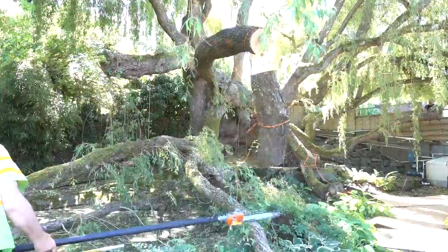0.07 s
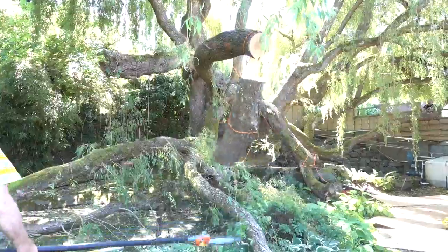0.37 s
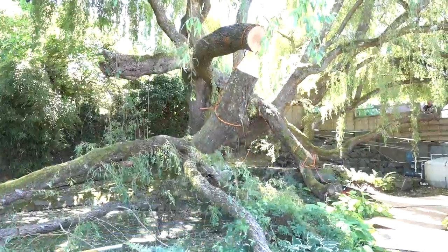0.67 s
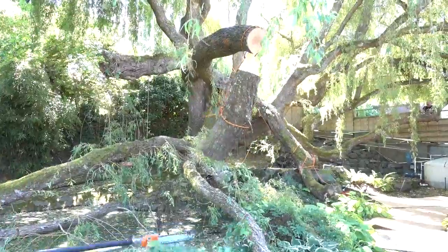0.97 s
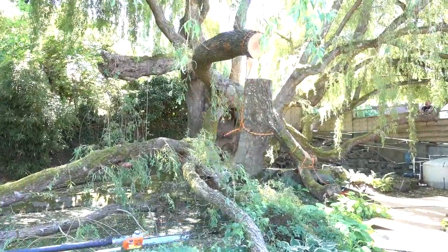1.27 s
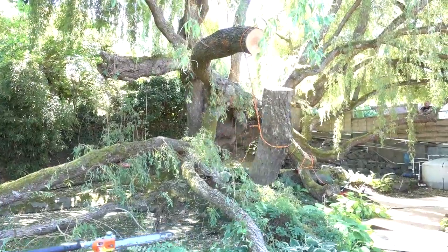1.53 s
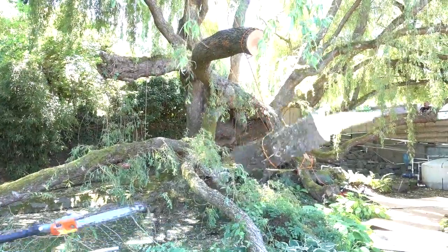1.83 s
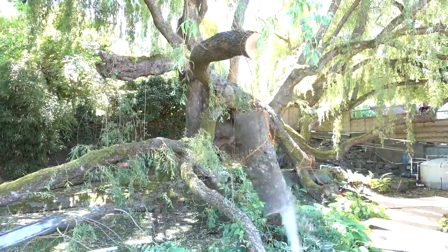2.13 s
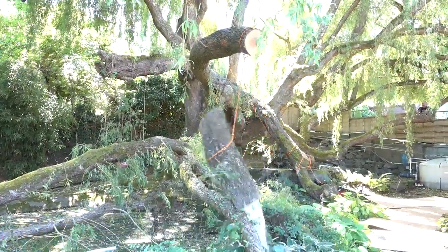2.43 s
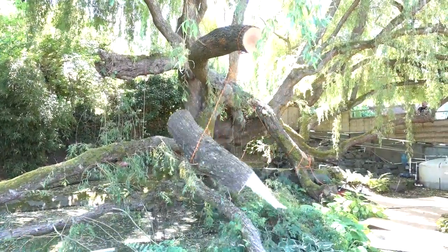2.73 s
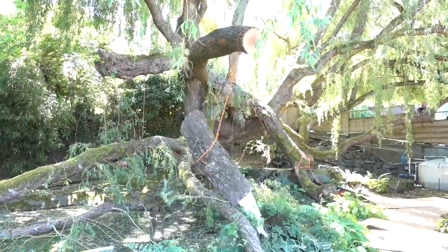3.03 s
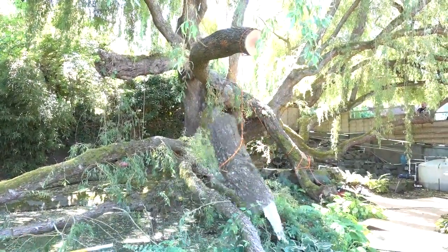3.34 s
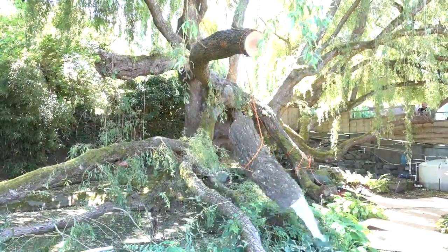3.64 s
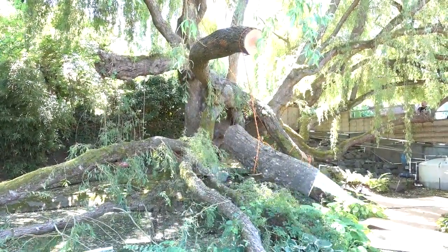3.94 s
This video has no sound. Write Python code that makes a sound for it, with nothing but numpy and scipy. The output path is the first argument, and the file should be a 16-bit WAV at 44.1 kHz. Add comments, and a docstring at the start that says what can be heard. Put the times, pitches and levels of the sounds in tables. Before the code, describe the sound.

A two-stroke pole saw idles close on the left, then cuts out and rattles to a stop. A cut log breaks loose with a crack and swings through branches, with snapping twigs, rustling leaves and wooden knocks in a quiet garden.

```python
"""Quiet garden with a short echo. A two-stroke pole saw idles close by on the left, is switched off
and coasts to a stop: gas pulses ring its silencer, the casing clacks, the chain rattles.
A sawn log on a rope breaks loose, swings through willow twigs and rings as it bumps fallen limbs.
Twigs snap, leaves rustle and bark scrapes over faint outdoor air."""
import sys
import numpy as np
from scipy import signal
from scipy.fft import rfft, irfft
from scipy.io import wavfile

SR = 44100
rng = np.random.default_rng(int(sys.argv[2]) if len(sys.argv) > 2 else 0)


def store_wav(level_fs):
    """Save 16-bit WAV to argv[1]."""
    pcm = np.round(np.clip(np.atleast_2d(level_fs), -1, 1) * 32767)
    wavfile.write(sys.argv[1], SR, pcm.T.astype(np.int16))


N = 176400

# idle firings: start_s, level_db
FIRINGS = [(.0075,0),(0.0476,1),(0.0847,0),(0.1241,1.5),(0.1625,3.5),(0.2022,-1.5),(0.2416,-1.5),(0.2817,1),(0.3224,-2.5),(0.366,-2),(0.4092,3),(0.4517,1.5),(0.4952,1.5),(0.5364,-1.5),(0.5779,1.5)]
# piston strokes after ignition cut: start_s, puff_db, rattle_db
COAST_STROKES = [(0.626,-0.5,-1),(0.676,-4.5,2),(0.728,-4,-8),(0.741,-1.5,-6.5),(0.794,-4,-8.5),(0.818,-4.5,-6.5),(0.886,-37,-8),(0.926,-14,-7.5),(.968,-20,-20),(1.013,-14,-10.5),(1.064,-17,-16.5)]
# silencer resonances: centre_hz, width_hz, gain_db
SILENCER_MODES = [(260,78,-6.5),(329,82,3.5),(450,83,-19),(539,66,-0.5),(970,210,-5)]
REBOUND_S = 0.0105  # firing to second puff


def puff(level_db, size=4096):
    """One gas pulse rings the silencer, slightly detuned each time."""
    detune = np.exp(0.045 * rng.standard_normal())
    modes = [(hz * detune, width_hz, db) for hz, width_hz, db in SILENCER_MODES]
    return undb(14 + level_db) * resonate(signal.unit_impulse(size), modes)


def saw_exhaust():
    """Two puffs per firing; one dull, wheezing puff per coasting stroke."""
    puffs, wheeze_env = np.zeros((2, N))
    for start_s, db in FIRINGS:
        add(puffs, start_s - 0.00088, puff(db / 2))  # just ahead of the clack
        add(puffs, start_s + REBOUND_S, puff(db / 2 - 5.5))
    for start_s, puff_db, _ in COAST_STROKES:
        add(puffs, start_s, cut(puff(puff_db), 540, "low"))
        wheeze_env += undb(puff_db) * burst(start_s, 0.0024, 0.0058)
    wheeze = resonate(cut(wheeze_env * rng.standard_normal(N), 590, "low"), SILENCER_MODES)
    return cut(cut(puffs + undb(-10) * wheeze, 188, "high"), 2600, "low")


def saw_mechanics(casing_q=14.1, pan_db=9):
    """Clacks, chain rattle and whirr ring the casing over a rush of noise; coasting strokes clink."""
    casing_modes = [(1150,-5),(1410,3.5),(1630,3),(2000,1.5),(2400,-0.5),(2660,4),(3250,1.5),(3870,-0.5),(5300,-0.5),(6740,-2.5),(8750,-11),(10400,-23)]  # centre_hz, gain_db
    whirr_levels = [(.39,-3.5),(.85,-5.5),(1.08,-7),(1.2,-19)]  # turning engine: time_s, level_db
    rush_spectrum = [(150,-37),(600,-6.5),(1500,3.5),(11000,-0.5)]  # freq_hz, density_db
    clack_env, rattle_env, clink_env = np.zeros((3, N))
    for start_s, db in FIRINGS:
        clack_env += undb(db) * burst(start_s, 0.0012, 0.0028)
        rattle_env += undb(db / 2 - 1) * burst(start_s + REBOUND_S, 0.00028, 0.011)
    for start_s, _, rattle_db in COAST_STROKES:
        clink_env += undb(rattle_db) * burst(start_s, 0.0014, 0.014)
        rattle_env += undb(rattle_db) * burst(start_s, 0.0034, 0.01)
    whirr_env = curve(whirr_levels)
    clack = undb(-13) * clack_env * noise(1.0)
    rattle = undb(-13) * cut(rattle_env * grains(1800, 1.14, 0.71), 3440, "low")
    whirr = undb(-41.5) * whirr_env * noise(0.25)
    casing = resonate(clack + rattle + whirr, [(hz, hz / casing_q, db) for hz, db in casing_modes])
    clink = undb(-9.5) * band(clink_env * noise(0.26), casing_modes[1][0], width_hz=84)
    rush = undb(-31.5) * colour((whirr_env + undb(6) * clack_env) * noise(1.02), rush_spectrum)
    return (cut(casing, 960, "high") + clink) * pan(pan_db) + rush


def saw_rumble():
    """Low engine noise, fading as the saw stops."""
    levels = [(.02,-34),(.08,-39),(.3,-38.5),(.38,-29.5),(.52,-37),(.85,-54.5),(1.3,-70)]  # time_s, level_db
    spectrum = [(40,-22),(75,5),(105,-1),(370,6.5),(700,1),(1500,-19)]  # freq_hz, density_db
    return curve(levels) * colour(noise(0.15), spectrum)


def twig_snaps(size=4096):
    """A twig gives with one click; its last fibres tear and ring it briefly."""
    snaps = [(1.1529,-3.5,5330,0.00031),(1.1532,-15,2280,0.00069),(1.269,-13,3650,0.0018),(1.3195,-14.5,6800,0.0015),(1.3772,-17,2600,0.001),(1.563,-24.5,2160,0.0013),(1.8695,-15,2750,0.00074),(1.912,-20.5,4470,0.00056),(1.9216,-19.5,2050,0.0015),(1.973,-12.5,2680,0.0011),(1.991,-16,1540,0.0011),(2.0764,-14.5,5300,0.0008),(2.103,-17,1380,0.0009),(2.178,-19.5,2830,0.0015),(2.333,-14,2030,0.00055),(2.352,-14.5,5640,0.0009),(2.4544,-21,6140,0.00055),(2.4722,-17.5,2040,0.0011),(2.534,-19,2150,0.0019),(2.57,-22,5500,0.0012),(2.844,-27.5,2100,0.0016),(2.9674,-10,2070,0.00053),(2.9675,-6.5,9200,0.00057),(3.1014,-18.5,3800,0.0017),(3.129,-19,3020,0.0046),(3.191,-25,1420,0.0035),(3.196,-21,2880,0.00098)]  # start_s, level_db, ring_hz, decay_s
    out = np.zeros((2, N))
    for start_s, db, ring_hz, decay_s in snaps:
        weight = np.sqrt(decay_s * SR / 2)
        tail_env = undb(-1.5) * burst(0, decay_s, decay_s * 6, size)
        tear = noise(0.067, size) * (burst(0, 0.00016, decay_s, size) + tail_env)
        tear[:, 0] += undb(4) * weight  # the click
        ring = unit(band(tear, ring_hz, ring_hz * 0.28))
        crack = unit(cut(cut(tear, ring_hz * 0.5, "high"), ring_hz * 2.07, "low", order=4))
        gain = undb(db - 5.5) * weight / np.sqrt(size)
        add(out, start_s, gain * (ring + crack) * contact_pan(start_s))
    return out


def log_knocks(t60_at_1khz_s=0.036, size=8192):
    """The log rings in damped modes, low ones longest; harder blows crunch more bark."""
    knocks = [(1.1523,-15.5,730),(1.491,-26.5,1570),(1.52,-30,1470),(2.12,-26,567),(2.234,-27,375),(2.359,-27,860),(2.678,-26.5,403),(2.726,-31,440),(3.121,-22.5,1190),(3.126,-21.5,706),(3.146,-25.5,1210),(3.255,-32,1160),(3.289,-34.5,1130),(3.341,-41.5,1150),(3.51,-39.5,1230),(3.714,-45.5,1000),(3.785,-44,400),(3.819,-43,1400)]  # start_s, level_db, centre_hz
    log_modes = [(410,-0.5),(560,-4.5),(680,-2),(830,-2),(1050,-9),(1200,5.5),(1420,2.5),(2400,8)]  # pitch_hz, gain_db
    out, age_s = np.zeros((2, N)), np.arange(size) / SR
    mode_hz, mode_db = np.array(log_modes).T[:, :, None]
    fade = np.exp(-np.log(1000) * age_s / t60_at_1khz_s * np.sqrt(mode_hz / 1000))
    for start_s, db, centre_hz in knocks:
        weight = undb(mode_db) / (1 + (np.log2(mode_hz / centre_hz) / 0.6) ** 2)
        detuned_hz = mode_hz * (1 + 0.031 * rng.standard_normal(mode_hz.shape))
        polarity = rng.choice([-1, 1], mode_hz.shape)
        ring = (polarity * weight * np.sin(2 * np.pi * detuned_hz * age_s) * fade).sum(0)
        crunch = band(noise(0.35, size) * burst(0, 0.001, 0.011, size), centre_hz, centre_hz * 0.8)
        knock = undb(-2) * ring + undb(16 + db / 2) * crunch
        add(out, start_s, undb(db) * knock * contact_pan(start_s))
    return cut(out, 226, "high")


def contact_pan(time_s):
    """Stereo gains of the log's point of contact."""
    path = [(1.15,-0.5),(1.95,-3),(2.46,0),(2.54,7),(2.97,-1),(3.12,5)]  # time_s, left_over_right_db
    return pan(np.interp(time_s, *np.array(path).T))


def branches():
    """Limbs sway, bark scrapes and leaves crackle as the log drags through."""
    drag_levels = [(1.148,-88,-84,-98),(1.16,-45,-43,-37),(1.25,-42,-32,-25),(1.31,-45.5,-36.5,-27),(1.37,-50.5,-39.5,-38),(1.49,-50,-37.5,-32),(1.58,-49,-41,-36),(1.63,-54.5,-51,-57),(1.74,-61,-54,-60),(1.785,-56,-43,-35.5),(1.86,-56,-64,-50.5),(1.89,-53,-40,-39),(1.97,-47,-50.5,-35),(2.04,-42,-39.5,-34),(2.15,-40,-42,-38.5),(2.25,-44,-35,-32.5),(2.355,-45.5,-40.5,-36),(2.46,-56,-49.5,-45.5),(2.545,-43.5,-37,-30.5),(2.61,-53,-48,-43.5),(2.69,-38,-39.5,-37.5),(2.78,-53,-50,-47.5),(2.96,-55,-52,-43),(2.98,-53,-52,-34),(3.095,-55.5,-40,-35),(3.14,-44.5,-30,-27.5),(3.24,-49.5,-46,-41.5),(3.42,-62,-56,-49.5),(3.63,-68,-63,-57),(3.67,-66,-46.5,-42.5),(3.75,-62.5,-53.5,-58),(4,-63,-75,-73)]  # time_s, limb_db, bark_db, leaf_db
    # each: freq_hz, density_db
    limb_spectrum = [(25,-30),(70,-13.5),(220,0.5),(380,9),(600,1.5),(1000,-1.5),(2500,-51)]
    bark_spectrum = [(250,-47),(600,-4),(1300,5),(1800,0.5),(2500,2),(4000,-17),(9000,-41)]
    leaf_spectrum = [(1200,-38),(3000,-7.5),(4800,-10),(11000,-10)]
    limbs = colour(grains(900, 0.72, 0.14) * curve(drag_levels, column=1), limb_spectrum)
    bark = colour(grains(1500, 3, 0.5) * curve(drag_levels, column=2), bark_spectrum)
    leaves = colour(grains(3000, 2.6, 0.83) * curve(drag_levels, column=3), leaf_spectrum)
    return limbs + bark + leaves


def garden_echo(x, t60_s=0.35, size=22050):
    """Trunks, fence and ground add a short, dull echo."""
    tail = cut(rng.standard_normal((2, size)), 6350, "low", order=1)
    tail *= burst(0.003, 0.0014, t60_s / np.log(1000), size)
    mono_lows = undb(-3.5) * cut(tail[0], 1350, "low", order=1)
    tail = cut(tail, 860, "high", order=1) + mono_lows
    return x + undb(-11) * signal.fftconvolve(x, unit(tail) / np.sqrt(size), axes=1)[:, :N]


def outdoor_air():
    """Faint, steady noise."""
    # freq_hz, density_db
    spectrum = [(30, -49), (200, -29), (400, 0.5), (2200, -4), (3900, -1.5), (4900, -25), (11000, -15.5)]
    return undb(-55.5) * colour(noise(0.64), spectrum)


def undb(db):
    """Decibels to gain."""
    return 10 ** (np.asarray(db) / 20)


def unit(x):
    """Scale to rms 1."""
    return x / np.sqrt(np.mean(x ** 2))


def curve(rows, column=1):
    """Gain following one dB column of a timed table."""
    rows = np.array(rows)
    return undb(np.interp(np.arange(N) / SR, rows[:, 0], rows[:, column]))


def pan(left_over_right_db):
    """Left and right gains."""
    return undb(np.array([[1], [-1]]) * left_over_right_db / 2)


def noise(spread, size=N):
    """Stereo white noise; spread 0 is mono."""
    white = rng.standard_normal((3, size))
    return (white[0] + spread * white[1:]) / np.sqrt(1 + spread ** 2 / 2)


def grains(rate_hz, scatter_db, spread):
    """Dense, tiny noise clicks of uneven size."""
    hits = rng.random(N) < rate_hz / SR
    gains = undb(scatter_db * np.minimum(rng.exponential(size=N), 5))
    power = signal.lfilter([1], [1, -0.92], (hits * gains) ** 2)
    return unit(np.sqrt(power) * noise(spread))


def colour(x, spectrum):
    """Shape by a spectrum, keeping the power of white noise."""
    hz, db = np.array(spectrum).T
    gain = undb(np.interp(np.log(np.fft.rfftfreq(N, 1 / SR) + 1), np.log(hz), db))
    return irfft(rfft(x) * unit(gain), N)


def band(x, hz, width_hz):
    """One resonance, gain 1 at its centre."""
    hz = min(hz, SR / 3)
    return signal.lfilter(*signal.iirpeak(hz, hz / min(width_hz, SR / 3), fs=SR), x)


def cut(x, hz, kind, order=2):
    """Low-pass or high-pass."""
    return signal.sosfilt(signal.butter(order, min(hz, SR / 3), kind, fs=SR, output="sos"), x)


def resonate(x, modes):
    """Parallel resonances."""
    return sum(undb(db) * band(x, hz, width_hz) for hz, width_hz, db in modes)


def burst(start_s, attack_s, decay_s, size=N):
    """Envelope: linear rise, exponential decay."""
    age_s = np.maximum(np.arange(size) / SR - start_s, 0)
    fade = np.exp(-np.minimum(np.maximum(age_s - attack_s, 0) / decay_s, 20))
    return np.minimum(age_s / attack_s, 1) * fade


def add(out, start_s, sound):
    """Mix a sound in at a time."""
    i = max(int(start_s * SR), 0)
    out[..., i:i + sound.shape[-1]] += sound[..., :N - i]


def scene():
    """Saw, snaps and knocks with echo; branches and air without."""
    saw = saw_exhaust() + saw_mechanics() + saw_rumble()
    return garden_echo(saw + twig_snaps() + log_knocks()) + branches() + outdoor_air()


def record(dry):
    """Soft peak limiting, then a steep low-pass."""
    ceiling, top_hz = 0.8, 11080
    lowpass = signal.ellip(10, 0.2, 75, top_hz, fs=SR, output="sos")
    return signal.sosfilt(lowpass, ceiling * np.tanh(dry / ceiling))


dry = scene()
out = record(dry)
store_wav(out)
```